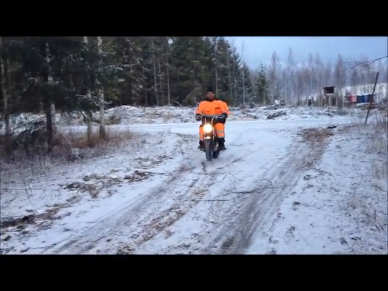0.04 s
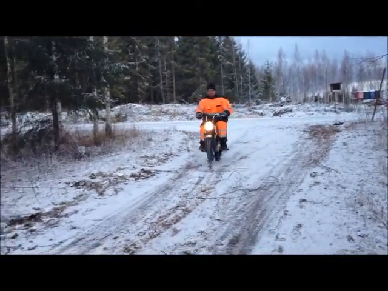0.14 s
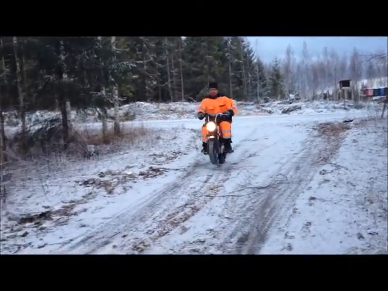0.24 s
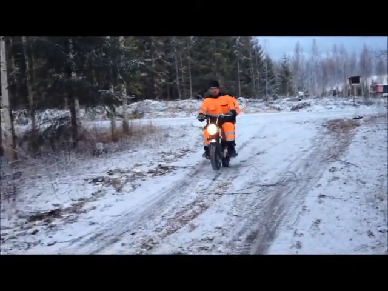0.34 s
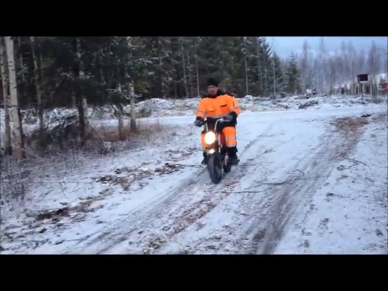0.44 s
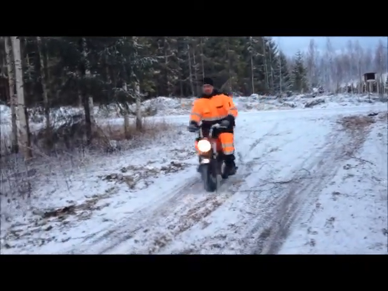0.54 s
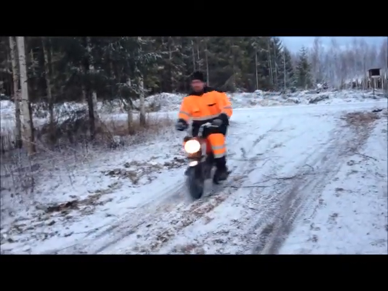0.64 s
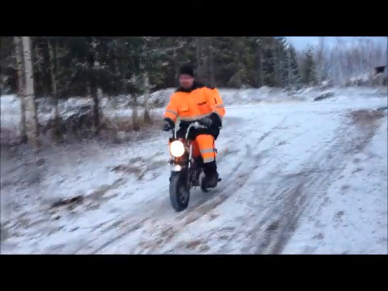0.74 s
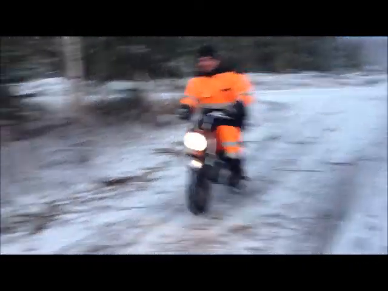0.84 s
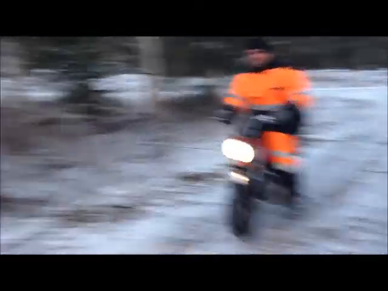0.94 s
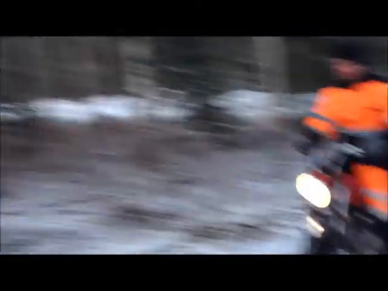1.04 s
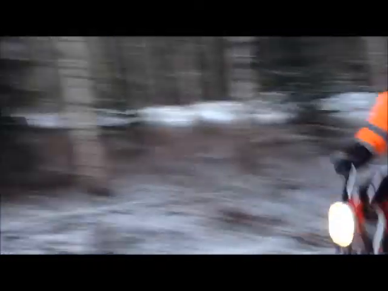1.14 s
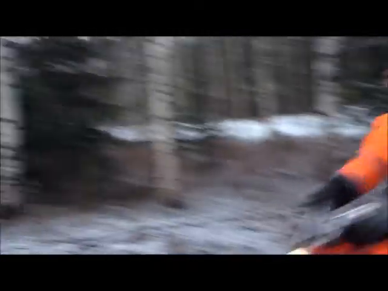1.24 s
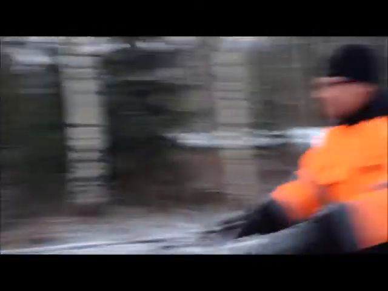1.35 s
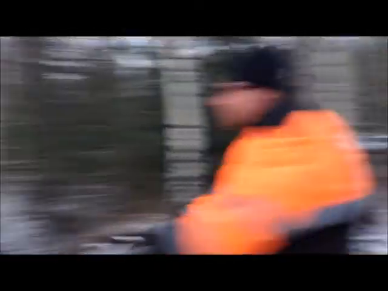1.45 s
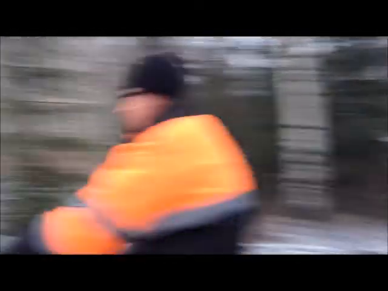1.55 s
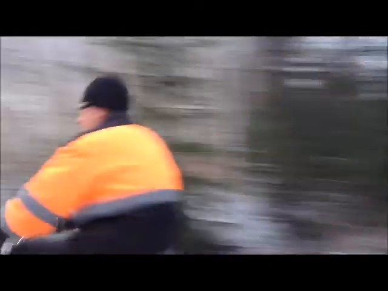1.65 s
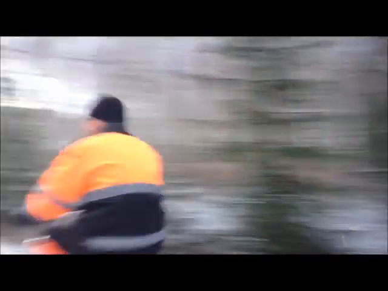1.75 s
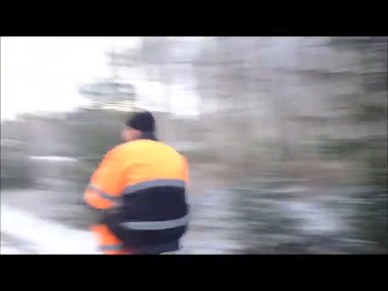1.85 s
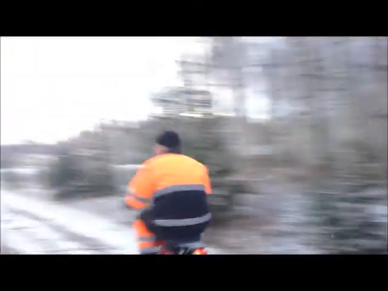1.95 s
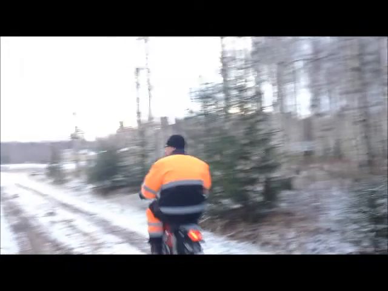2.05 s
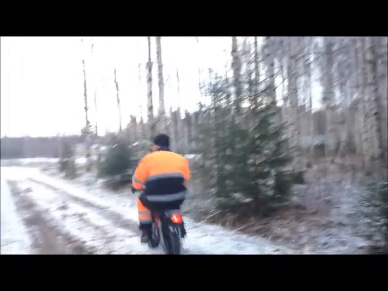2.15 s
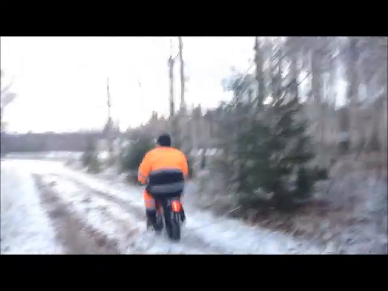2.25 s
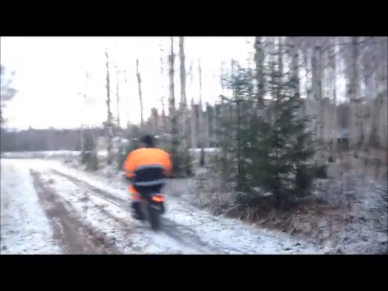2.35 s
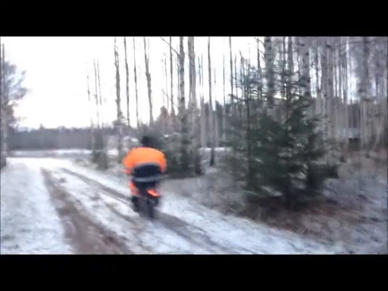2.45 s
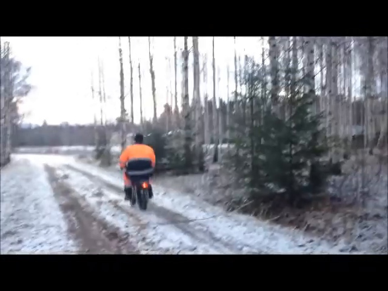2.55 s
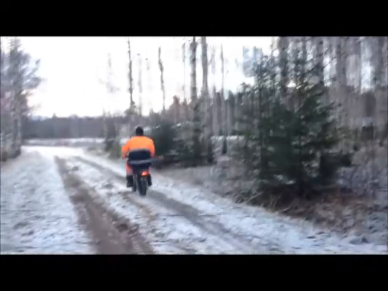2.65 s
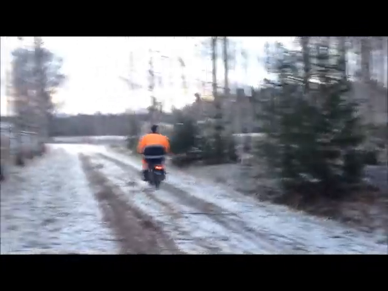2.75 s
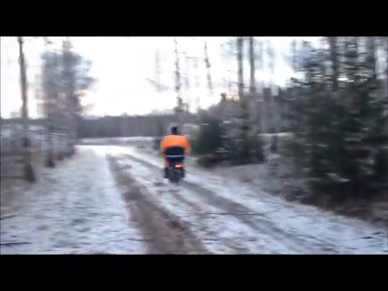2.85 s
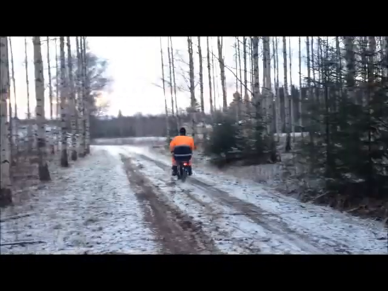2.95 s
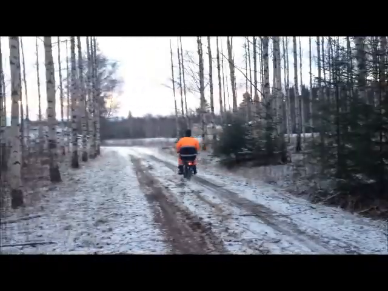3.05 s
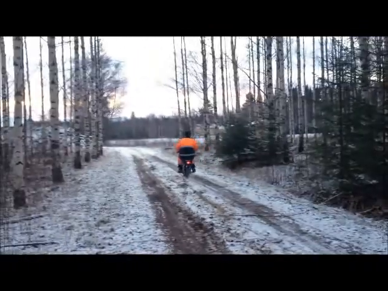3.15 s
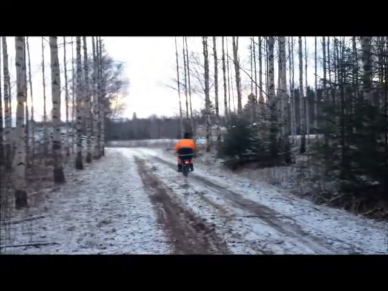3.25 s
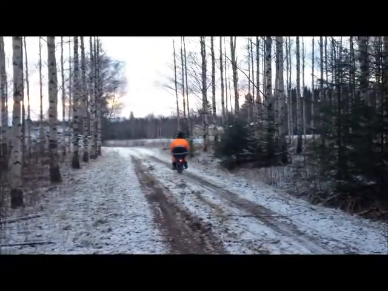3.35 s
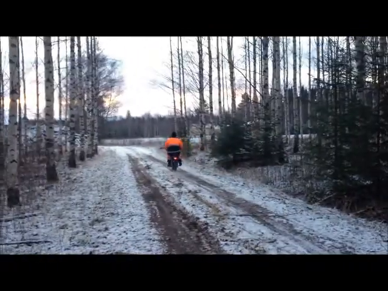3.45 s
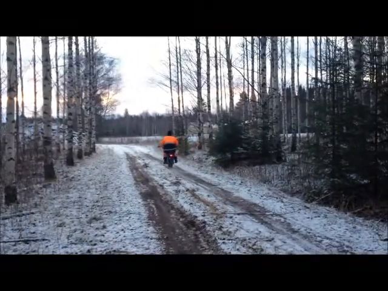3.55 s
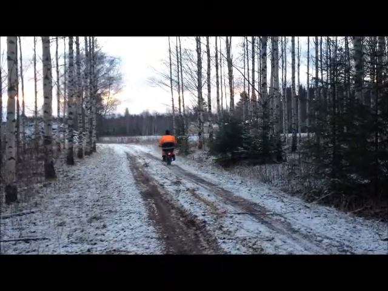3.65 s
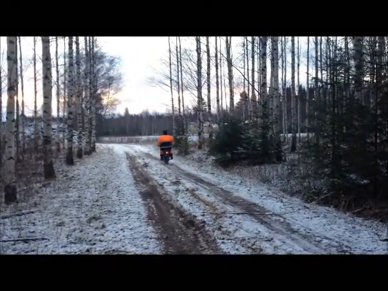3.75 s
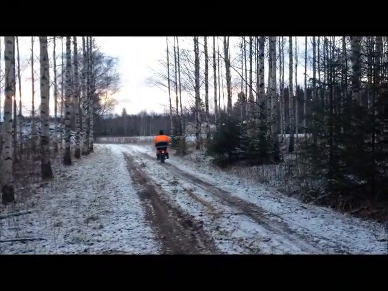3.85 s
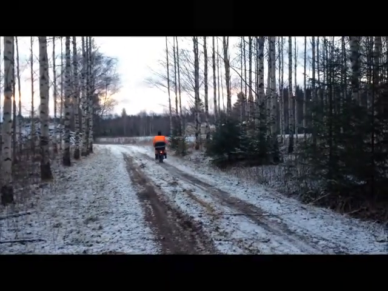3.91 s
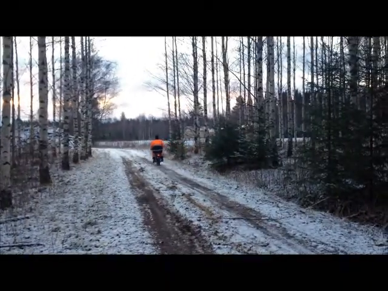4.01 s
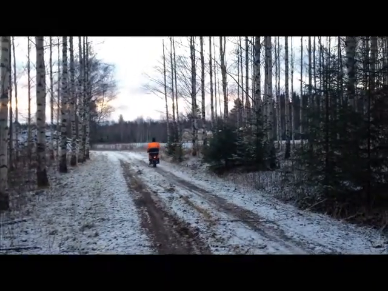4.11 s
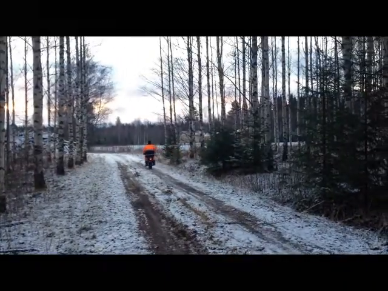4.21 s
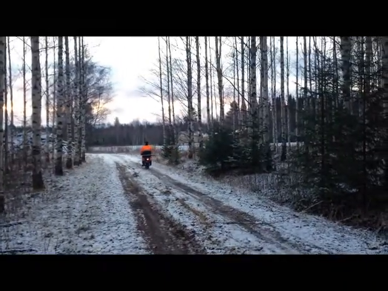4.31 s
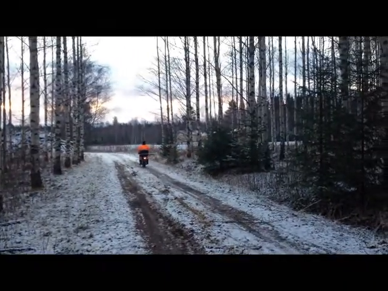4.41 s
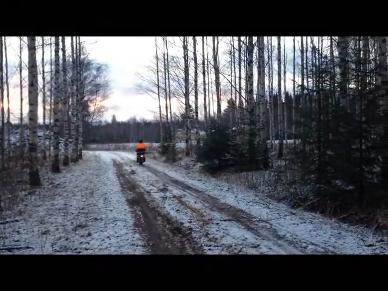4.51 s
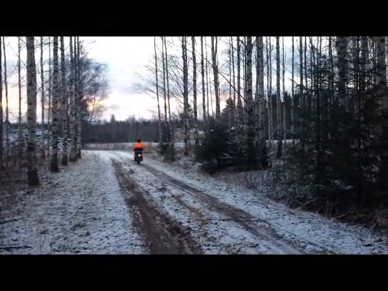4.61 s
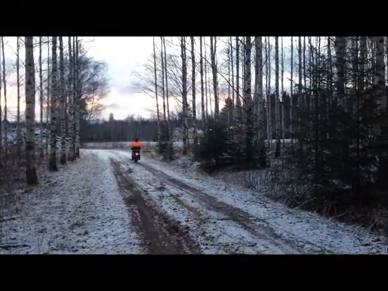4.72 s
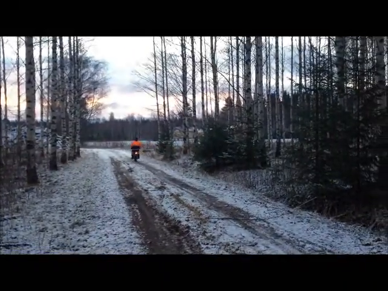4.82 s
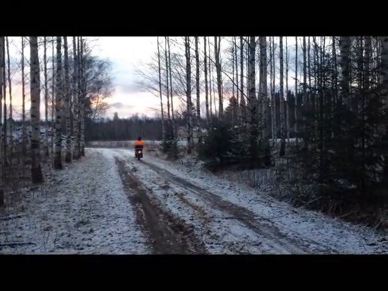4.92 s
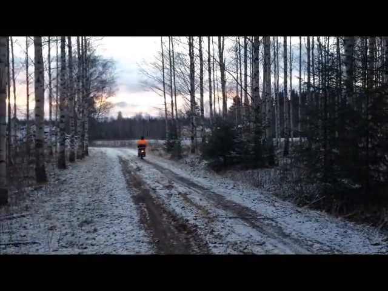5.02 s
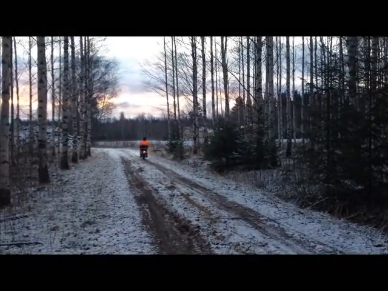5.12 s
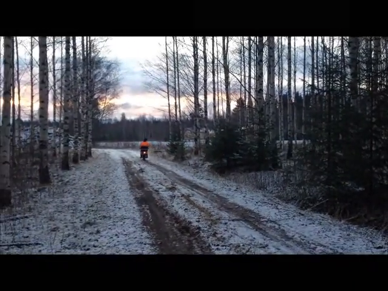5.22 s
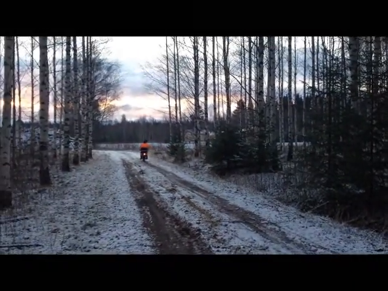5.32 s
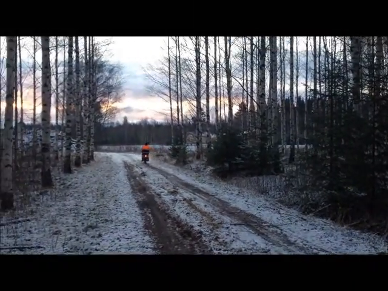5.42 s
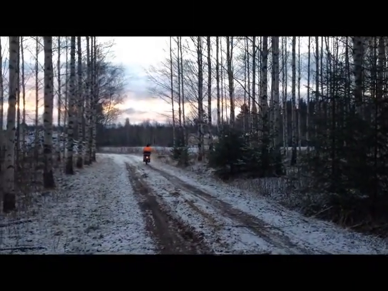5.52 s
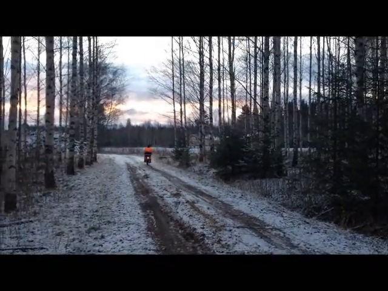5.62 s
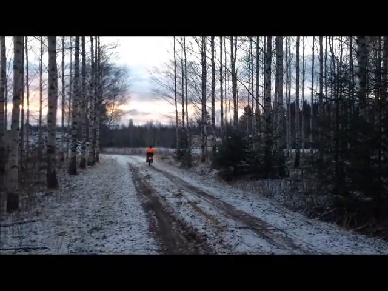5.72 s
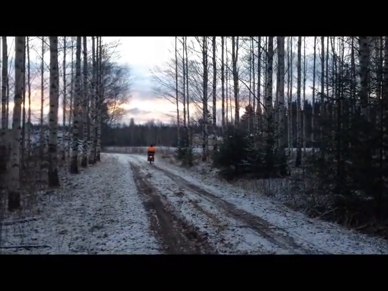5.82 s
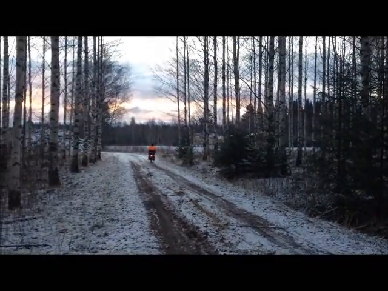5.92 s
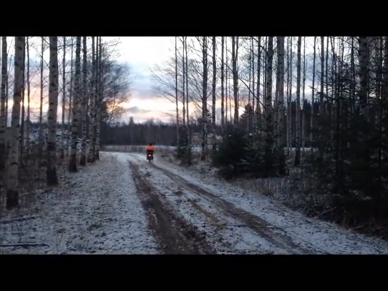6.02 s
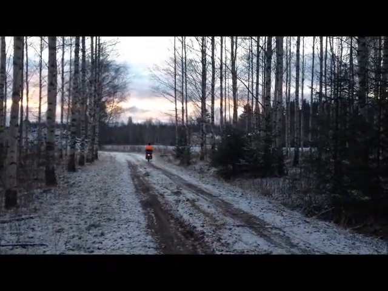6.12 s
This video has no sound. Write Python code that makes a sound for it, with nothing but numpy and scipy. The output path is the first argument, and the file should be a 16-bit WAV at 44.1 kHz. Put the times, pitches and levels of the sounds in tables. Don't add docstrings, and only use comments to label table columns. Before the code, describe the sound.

A small single-cylinder motorbike buzzes hard past on a snowy forest track, clacks through a gear change, pulls away, then coasts off into faint winter air.

```python
import sys
import numpy as np
from scipy import signal
from scipy.io import wavfile
from scipy.ndimage import uniform_filter1d

SR = 44100
rng = np.random.default_rng(int(sys.argv[2]) if len(sys.argv) > 2 else 0)


def ratio(d):
    e = np.asarray(d, float) / 20
    return 10 ** e


def unload_wav(signal):
    wavfile.write(
        sys.argv[1],
        SR,
        np.round(np.clip(np.atleast_2d(signal).T, -1, 1) * 32767).astype(np.int16),
    )


N = 272097
TIME_S = np.arange(N) / SR

# time in seconds, factor on the returns; soft puffs echo less.
HEAT = [
    (0, 1),
    (1.76, 1),
    (1.84, .3),
    (2.08, .3),
    (2.2, 1),
    (3.75, 1),
    (3.9, .6),
    (5, .3),
    (6.2, .3),
]
# bearing from the nose in degrees, level re nearness in dB under and above 4.8 kHz.
RATTLE_BEAM = [(15, 1.5, -8.5), (32, 3, -6), (50.03, 1.5, -2.5), (117, 2, -1.5), (134.3, 3, -4.5),
               (141.6, 5.5, 3), (162, 5, -1), (179, 4.5, -6)]
# drop in dB, further fade in dB per s squared.
RATTLE_SHUT = [
    (-3, 0.025),
    (-3, -0.15),
]


def evened(x):
    return x / np.sqrt(np.mean(x ** 2) + 1e-20)


def smooth_twice(x, size):
    return uniform_filter1d(uniform_filter1d(x, size=size), size=size)


def running_rms(x):
    return np.sqrt(abs(smooth_twice(x ** 2, 3000)) + 1e-20)


def columns(rows):
    s, *rest = np.transpose(rows)
    return [np.interp(TIME_S, s, c) for c in rest]


def read(points, hz):
    f, value = np.transpose(points)
    return np.interp(np.log(hz + 1), np.log(f + 1), value)


def ring(x, hz, width_hz):
    r = np.exp(-np.pi * width_hz / SR)
    return signal.lfilter([1 - r, 0, r - 1], [1, -2 * r * np.cos(2 * np.pi * hz / SR), r * r], x)


def slide(x, hz, width_hz):
    turn = np.exp(2j * np.pi * np.cumsum(hz) / SR)
    r = np.exp(-np.pi * width_hz / SR)
    wide = np.exp(-3 * np.pi * width_hz / SR)
    smooth = signal.lfilter([(1 - r) * (1 - wide)], np.convolve([1, -r], [1, -wide]), x / turn)
    return 2 * (turn * smooth).real


def passage(x, low_hz, high_hz):
    return signal.sosfiltfilt(signal.butter(2, [low_hz, high_hz], "band", fs=SR, output="sos"), x)


def noise(colour_db, patchy_db, long, wide):
    frames, hz = N // 128 + 5, np.fft.rfftfreq(512, 1 / SR)[:, None]
    a, b, patches = rng.standard_normal((frames, 257, 3)).T
    patches = uniform_filter1d(patches, int(wide), axis=0)
    patches = evened(uniform_filter1d(patches, int(long), axis=1))
    level_db = colour_db(hz, np.arange(frames) * 128 / SR) + patchy_db * patches
    return signal.istft((a + 1j * b) * ratio(level_db), nperseg=512, noverlap=384)[1][:N]


def heard(beam_rows, shut_rows):
    # time in seconds, nearness in dB.
    near = [(0, -27.5), (.1, -28), (.25, -30), (.66, -29.5), (.9, -23), (1.4, -23), (1.9, -23),
            (2.05, -30.5), (2.2, -34), (2.65, -36), (3.7, -38.5), (4.2, -42), (4.8, -45.5), (5.5, -49.5),
            (6.17, -52)]
    abreast_s, speed_per_gap = 1.5, 2.5
    shut_s, shut_takes_s = 3.75, .05
    bearing_deg = 90 + np.degrees(np.arctan(speed_per_gap * (TIME_S - abreast_s)))
    closed = np.clip((TIME_S - shut_s) / shut_takes_s, 0, 1)
    coasting_s = np.maximum(TIME_S - shut_s, 0)
    near_db = columns(near)[0]
    deg, *beams = np.transpose(beam_rows)
    return [near_db + np.interp(bearing_deg, deg, beam) + drop_db * closed + fade_db * coasting_s ** 2
            for beam, (drop_db, fade_db) in zip(beams, shut_rows)]


def engine():
    # time in seconds, firings per second.
    rate = [(0, 75.3), (.2, 65.2), (.6, 62.8), (.82, 70.9), (1.1, 72.4), (1.46, 75.6), (1.78, 77),
            (1.9, 81.4), (2.14, 59.5), (2.27, 58.6), (2.47, 61.6), (3.0, 63.6), (3.72, 67.7), (3.95, 62.6),
            (4.4, 60.9), (4.78, 57.2), (5.05, 51.3), (6.17, 37.8)]
    # time in seconds, spread of firing strength in dB, share of turbulence 0-1.
    unevenness = [
        (0, .3, .05),
        (1.2, .5, .06),
        (1.9, .4, .06),
        (2.2, .3, .04),
        (3.74, .3, .04),
        (3.82, 1.2, .3),
        (4.8, 1.6, .36),
        (6.2, 2.2, .4),
    ]
    turns = np.cumsum(columns(rate)[0]) / SR + .6
    spread_db, share = columns(unevenness)
    luck = rng.standard_normal((500, 2))[turns.astype(int)]
    strength = ratio(spread_db * luck[:, 0])
    steady, uneven = firings(turns, np.ones(N)), firings(turns, strength)
    puffs = strength * (.5 + np.exp(-(turns % 1) / 1.8)) * rng.standard_normal(N)
    gas = steady, uneven, puffs, share
    return exhaust(turns, *gas) + intake(*gas) + rattle(turns, uneven, 0.58 * luck[:, 1]) + whine(turns)


def firings(turns, strength):
    at = np.flatnonzero(np.diff(np.floor(turns)))
    late = (turns[at + 1] % 1) / (turns[at + 1] - turns[at])
    clicks = np.zeros(N)
    clicks[at] += late * strength[at + 1]
    clicks[at + 1] += (1 - late) * strength[at + 1]
    return clicks


def voiced(steady, uneven, puffs, share, body):
    tone = body(uneven) / running_rms(body(steady))
    return np.sqrt(1 - share ** 2) * tone + share * evened(body(puffs))


def pipe(x):
    echoes = [0.44, 0.56, 0.15]
    pipe_hz = 215.55
    returns = sum(g * np.roll(x, round((k + 1) * SR / pipe_hz)) for k, g in enumerate(echoes))
    return x + columns(HEAT)[0] * returns


def exhaust(turns, steady, uneven, puffs, share):
    # low edge in Hz, high edge in Hz.
    bands = [
        (105, 186.6),
        (168, 237.5),
        (248, 319.5),
        (412, 520),
    ]
    # bearing from the nose in degrees, dB re nearness of thump, body, throat, bark.
    beam = [(14.8, -1, 3.5, 7, 13.5), (17.6, 3.5, 2, 6.5, 12), (25, 3.5, 4.5, 7.5, 14),
            (35.7, 1, 4.5, 8.5, 14), (47.7, 3.5, 7, 9, 10), (60, 2.5, 4.5, 7.5, -1),
            (75.7, 0, 1.5, -3.5, 12.5), (91, 4.5, -5.5, -16, 14.5), (124.2, 8.5, -5, -5, 10.5),
            (128, 5.5, -2, -18, -11), (135.6, 0, 9.5, -11, -4.5), (143.8, 15, 6.5, -3, -8),
            (147, 4, 3, -3, -1), (147.3, 9, 10, 4, 0), (157.6, 13, -4, 8, 10.5), (175, 7.5, 7.5, 4, 6)]
    # drop in dB, further fade in dB per s squared.
    shut = [
        (-8.5, 0),
        (-0.5, -2.6),
        (-10, 0.5),
        (-15.5, -1.7),
    ]
    levels_db = heard(beam, shut)
    out = ratio(levels_db[0] - 9.0) * np.sin(2 * np.pi * turns)
    for band, db in zip(bands, levels_db):
        out += ratio(db) * voiced(steady, uneven, puffs, share, lambda x: passage(pipe(x), *band))
    return out


def intake(steady, uneven, puffs, share):
    # low edge in Hz, high edge in Hz.
    more_pipe_bands = [
        (350, 417.3),
        (560, 830),
    ]
    # bearing from the nose in degrees, dB re nearness of hum, edge, neck rasp, filter lid.
    beam = [(15.8, -12, -14, -5.5, -8), (17.8, 9.5, -8, 0.5, -4), (25, 7.5, -13, 4, -3.5),
            (33.5, -40, -17.5, 0, 0.5), (47, -5, -10.5, -1.5, -0.5), (59.5, -3, -0.5, -2.5, -2),
            (76, -4.5, 1, 1, -16), (99, 7, -3, 1.5, -7), (119, 11.5, 0, -1.5, 0), (128, -6, -5.5, -3, -12),
            (142, -23, -2, 1.5, -10), (140.2, 5, 1, -0.5, -2), (146.3, 3.5, 0, 0, -5),
            (149, 9.5, -11, 3, 2), (160, 3, -3, 1, -20), (170.3, 9, 2, -11, 0)]
    # drop in dB, further fade in dB per s squared.
    shut = [
        (-19, -1.5),
        (-12, -1.6),
        (-9, 1.2),
        (-22, 1.94),
    ]
    # time in seconds, centre in Hz.
    neck_path = [(0, 1380), (.3, 1383), (.6, 1362), (.85, 1393), (1.15, 1395), (1.3, 1525), (1.4, 1396),
                 (1.6, 1444), (1.85, 1424), (1.97, 1530), (2.2, 1394), (2.6, 1390), (3.7, 1474),
                 (6.2, 1307)]
    # factor on the centre, width in Hz, level in dB.
    rasps = [(1.004, 104, 19), (1.127, 128, 11)]
    # low edge in Hz, high edge in Hz.
    lid_band = (1007, 1393)
    *more_pipe_db, rasp_db, lid_db = heard(beam, shut)
    neck_hz = columns(neck_path)[0]

    def late(x):
        return np.roll(x, 260)

    def neck(x):
        return sum(ratio(db) * slide(late(x), k * neck_hz, width_hz) for k, width_hz, db in rasps)

    out = ratio(rasp_db) * voiced(steady, uneven, puffs, share + .2, neck)
    out += ratio(lid_db - 2) * voiced(steady, uneven, puffs, share, lambda x: passage(late(x), *lid_band))
    for band, db in zip(more_pipe_bands, more_pipe_db):
        out += ratio(db) * voiced(steady, uneven, puffs, share, lambda x: passage(pipe(x), *band))
    return out


def rattle_colour(hz, s):
    # time in seconds, view (0 front, 1 side, 2 behind, 3 far).
    view_path = [
        (0, 0),
        (.6, 0),
        (.95, 1),
        (2.1, 1),
        (2.8, 2),
        (3.8, 2),
        (4.8, 3),
        (6.2, 3),
    ]
    # frequency in Hz, level in dB per Hz.
    front = [(1150, -24), (1950, -2.5), (2420, -14), (2630, 2), (3130, -15), (3440, 1), (4050, -17),
             (4730, -11), (5560, -9.5), (6900, -9), (11200, -17.5), (13300, -31), (15200, -29)]
    side = [(1150, 6.5), (1950, -3), (2160, 4), (2480, -3), (3270, 5.5), (4010, 4.5), (4230, 2.5),
            (4810, -12), (6010, -8.5), (6440, -4), (8120, -9), (9560, -18.5), (12200, -17.5), (14700, -25),
            (15200, -19.5)]
    behind = [(1120, -5), (1900, -22), (2040, -69), (2340, -4.5), (2690, -21.5), (3260, -8.5), (3560, -9),
              (3980, 1.5), (4270, -7), (4740, -19.5), (5840, -4), (7260, -10.5), (10700, -18), (12100, -24),
              (15200, -34)]
    far = [(1000, -6), (1700, -34), (1930, -70), (2360, -3.5), (2760, -31), (3060, -3), (3810, 1),
           (4290, -3), (4750, -19), (5860, -2), (6660, -10.5), (8690, -8), (10100, -19), (13600, -24),
           (15200, -48)]
    view = np.interp(s, *np.transpose(view_path))
    looks = front, side, behind, far
    return sum(np.clip(1 - abs(view - k), 0, 1) * read(look, hz) for k, look in enumerate(looks))


def rattle(turns, clicks, luck_db):
    split_hz, fins_low_hz = 4740, 1100
    low_db, high_db = heard(RATTLE_BEAM, RATTLE_SHUT)
    gate = 1 + 0.12 * np.cos(2 * np.pi * (turns - .1)) + 0.033 * np.cos(4 * np.pi * (turns - .2))
    hiss = noise(rattle_colour, patchy_db=3.0, long=70, wide=4)
    same_each_time = hiss[SR:SR + 900] * np.exp(-TIME_S[:900] / 0.012)
    hiss = hiss * gate * ratio(luck_db)
    low = signal.sosfiltfilt(signal.butter(6, split_hz, fs=SR, output="sos"), hiss)
    high = hiss - low
    low = signal.sosfilt(signal.butter(3, fins_low_hz, "high", fs=SR, output="sos"), low)
    clatter = passage(signal.oaconvolve(clicks, same_each_time)[:N], 1550, 4300)
    clatter_gain = 0.75 * columns(HEAT)[0] ** .5
    low = low / running_rms(low) + clatter_gain * clatter / running_rms(clatter)
    high = high / running_rms(high)
    bumps_db = 0.62 * evened(smooth_twice(rng.standard_normal(N), 3000))
    return ratio(bumps_db) * (ratio(low_db - 5.0) * low + ratio(high_db) * high)


def whine(turns):
    # time in seconds, level in dB.
    level = [
        (3.7, -70),
        (4.1, -76),
        (4.8, -80),
        (5.3, -58),
        (5.9, -59),
        (6.2, -78),
    ]
    cycles_per_firing = 28.2
    waver = 1 + .5 * evened(uniform_filter1d(rng.standard_normal(N), size=700))
    return ratio(columns(level)[0]) * waver * np.sin(2 * np.pi * cycles_per_firing * turns)


def tyres():
    # frequency in Hz, level in dB per Hz.
    spectrum = [(60, -25), (150, -12), (400, -6), (900, -15), (2000, -15), (5000, -38)]
    crunch = evened(noise(lambda hz, s: read(spectrum, hz), patchy_db=2.5, long=5.4, wide=3.5))
    return crunch * ratio(heard(RATTLE_BEAM, RATTLE_SHUT)[0] - 6)


def knocks():
    # start in seconds, peak level in dB, centre in Hz, width in Hz.
    events = [
        (1.815, -15, 6600, 2500),
        (4.472, -32, 600, 200),
        (4.474, -36, 1150, 300),
        (5.08, -46, 2200, 1500),
    ]
    out = np.zeros(N)
    for start_s, db, hz, width_hz in events:
        t = np.maximum(TIME_S - start_s, 0)
        burst = rng.standard_normal(N) * np.exp(-t / 0.005) * (TIME_S >= start_s)
        clack = ring(ring(burst, hz, width_hz), hz, 2 * width_hz)
        out += ratio(db) * clack / abs(clack).max()
    return out


def trees(x):
    taps = np.zeros(SR // 2)
    at = np.arange(900, len(taps) - 40, 40)
    taps[at + rng.integers(0, 40, len(at))] = rng.choice([-1., 1.], len(at))
    taps = signal.lfilter([.3], [1, -.7], taps) * ratio(-60 * TIME_S[:len(taps)] / .5)
    return signal.oaconvolve(x, taps / np.linalg.norm(taps))[:N]


def winter_air():
    # frequency in Hz, level in dB per Hz.
    spectrum = [(30, 2), (100, -2), (250, 0), (500, -6), (2000, -16), (8000, -22), (15000, -40)]
    return ratio(-59) * evened(noise(lambda hz, s: read(spectrum, hz), patchy_db=-2.0, long=90, wide=3.8))


def scene():
    bike = engine() + tyres() + knocks()
    return (bike + ratio(-19.5) * trees(bike) + winter_air())[None]


def roll_off(x):
    return signal.sosfilt(signal.butter(12, 15360, fs=SR, output="sos"), x)


def record(dry):
    notch_hz, notch_width_hz, bass_cut_hz = 4740, 330, 98
    notch = signal.iirnotch(notch_hz, notch_hz / notch_width_hz, SR)
    x = signal.lfilter(*notch, signal.lfilter(*notch, dry))
    x = signal.sosfiltfilt(signal.butter(1, bass_cut_hz, "high", fs=SR, output="sos"), x)
    x = signal.sosfilt(signal.butter(2, bass_cut_hz, "high", fs=SR, output="sos"), x)
    x = x / (1 + abs(x / 1.05) ** 4) ** (1 / 4)
    return roll_off(x)


dry = scene()
out = record(dry)
unload_wav(out)
```